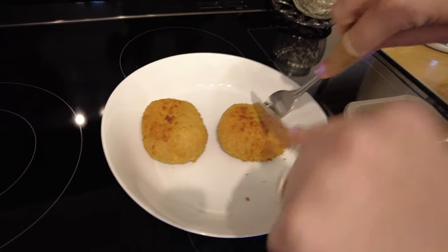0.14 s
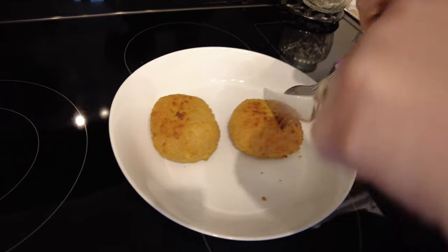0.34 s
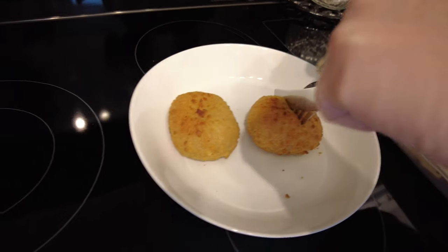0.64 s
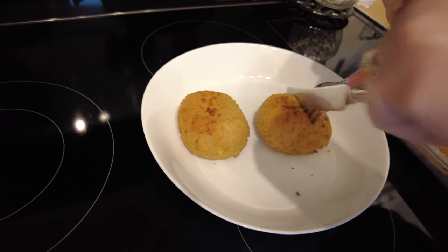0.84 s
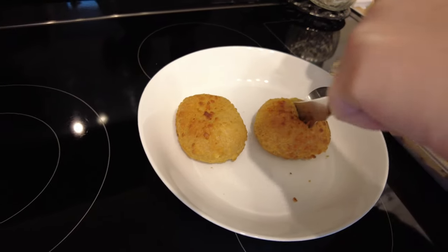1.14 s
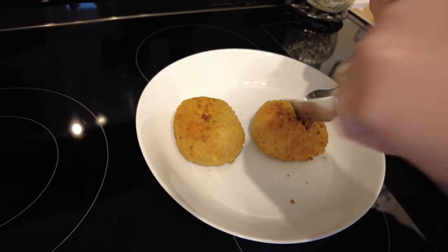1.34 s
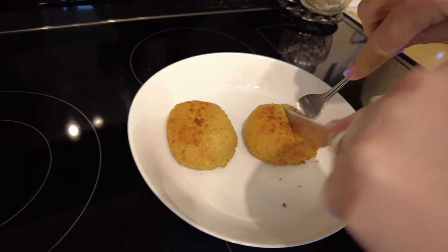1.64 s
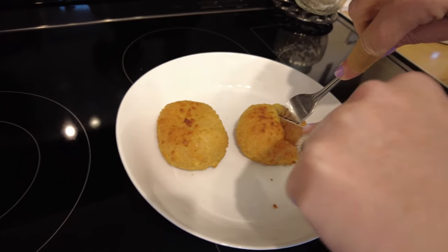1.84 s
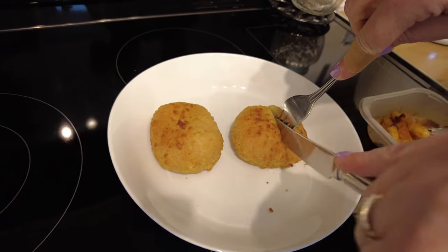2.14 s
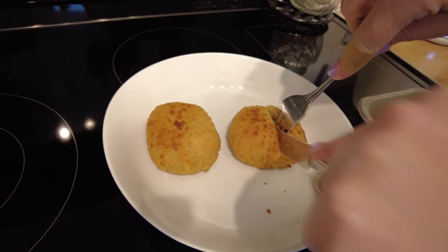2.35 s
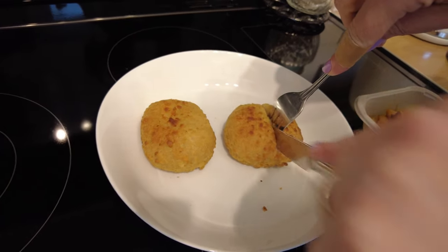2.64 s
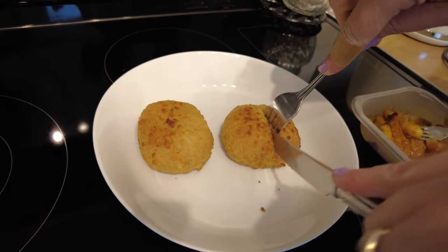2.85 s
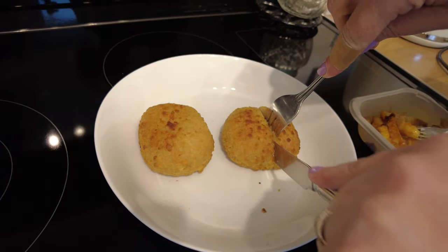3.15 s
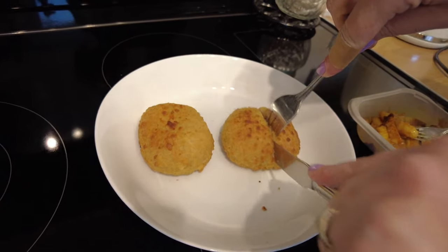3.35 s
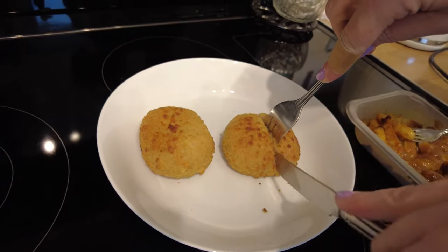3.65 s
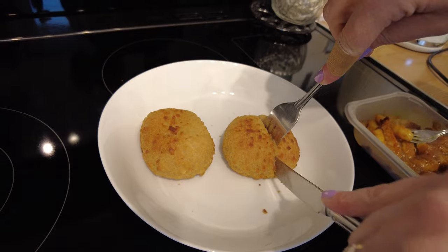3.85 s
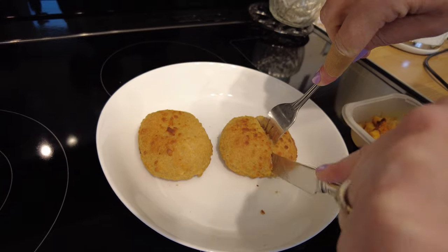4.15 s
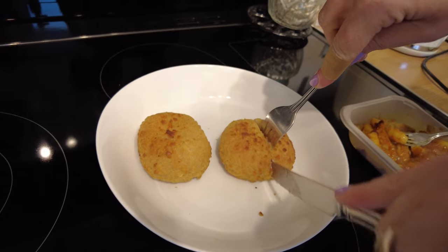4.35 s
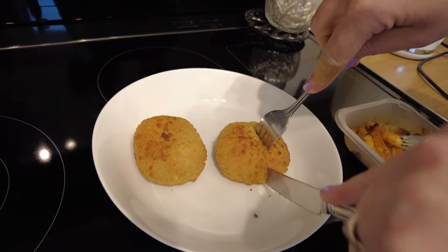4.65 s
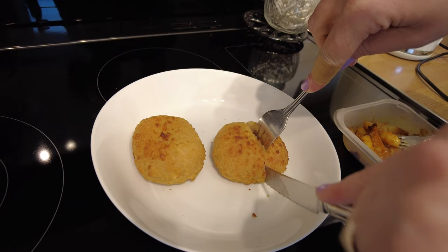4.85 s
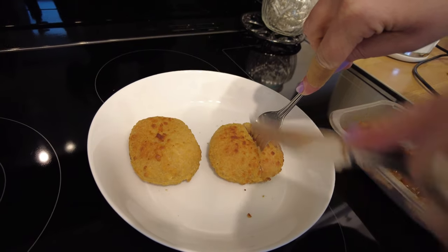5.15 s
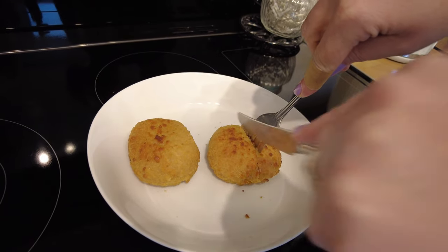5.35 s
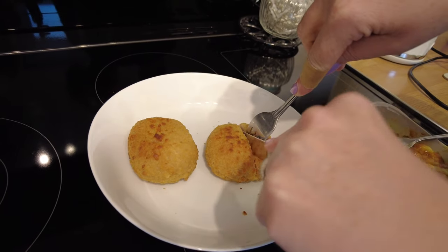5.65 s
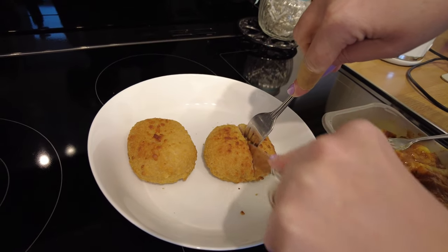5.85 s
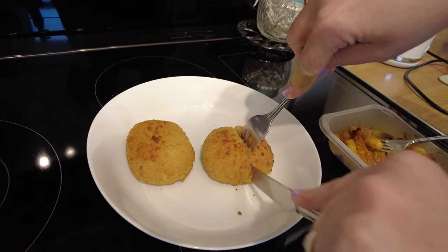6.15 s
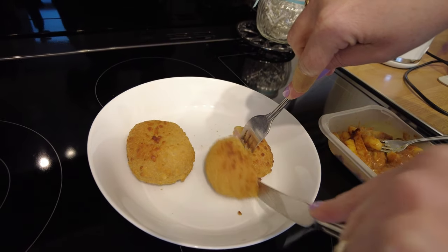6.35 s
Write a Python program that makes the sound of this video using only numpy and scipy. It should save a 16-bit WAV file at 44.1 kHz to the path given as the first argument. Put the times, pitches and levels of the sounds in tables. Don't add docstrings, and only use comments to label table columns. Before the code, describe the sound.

A steel knife and fork clink and scrape on a ceramic plate while sawing crumb-coated food, close up in a small kitchen with faint hum.

```python
import sys
import numpy as np
from scipy import signal
from scipy.fft import rfft, irfft, next_fast_len
from scipy.io import wavfile
from scipy.ndimage import uniform_filter1d, minimum_filter1d, map_coordinates

SR = 44100
rng = np.random.default_rng(int(sys.argv[2]) if len(sys.argv) > 2 else 0)


def invert_db(level):
    return 10 ** (np.asarray(level, dtype=float) / 20)


def transcribe(signal):
    frames = np.atleast_2d(signal).T
    limited = np.clip(frames, -1, 1)
    pcm = np.round(limited * 32767).astype(np.int16)
    wavfile.write(sys.argv[1], SR, pcm)


N = 286209


def unit(x):
    return x / np.sqrt(np.mean(x ** 2) + 1e-20)


def along(points, hz):
    f, v = np.transpose(points)
    return np.interp(np.log(hz + 1), np.log(f + 1), v)


def wobble(rate):
    knots = rng.standard_normal(int(N * rate / SR) + 4)
    return map_coordinates(knots, [np.arange(N) * rate / SR])


def filtered(x, response):
    m = next_fast_len(N + SR // 2)
    return irfft(rfft(x, m) * response(np.fft.rfftfreq(m, 1 / SR)), m)[..., :N]


def body(modes, widen):
    def response(f):
        total = 0
        for k, (centre, width, db) in enumerate(modes):
            loss = 1j * f * width * widen
            total = total + (-1) ** k * invert_db(db) * loss / (centre * centre - f * f + loss)
        return total
    return response


def spread(pair, alike):
    def mid_and_side(hz):
        turn = np.arccos(np.clip(along(alike, hz), -1, 1)) / 2
        return np.array([np.cos(turn), np.sin(turn)])
    mid, side = filtered(pair, mid_and_side)
    return np.array([mid + side, mid - side])


# frequency in Hz, level in dB per Hz.
AIR_COLOUR = [(76, -104.5), (130, -3.5), (194, -17), (279, -5.5), (511, -15), (1240, -13.5), (2010, -23.5),
              (2410, -18.5), (6870, -34.5), (15100, -34), (16000, -27)]
# frequency in Hz, level in dB per Hz.
RUMBLE_COLOUR = [(8, -50.5), (14, 9), (21, 9), (26, 6), (31, -17), (42, -9.5), (75, -12.5), (120, -13),
                 (200, -50.5)]
# frequency in Hz, level in dB rms.
HUM_TONES = [(100, -74), (262, -77)]
# frequency in Hz, likeness from 0 to 1.
BACKGROUND_ALIKE = [(50, 0.97), (200, 0.73), (600, 0.057), (2000, 0.24), (10000, 0.17)]


def background():
    t = np.arange(N) / SR
    air = unit(filtered(rng.standard_normal((2, N)), lambda f: invert_db(along(AIR_COLOUR, f))))
    rumble = unit(filtered(rng.standard_normal((2, N)), lambda f: invert_db(along(RUMBLE_COLOUR, f))))
    hum = 0
    for hz, db in HUM_TONES:
        level = invert_db(db + 4.5 + 0.53 * wobble(1.5))
        hum = hum + level * np.sin(2 * np.pi * hz * t + 0.16 * wobble(1.1))
    noise = invert_db(-63.77) * air + invert_db(-44.5 + wobble(0.86)) * rumble
    return spread(noise, BACKGROUND_ALIKE) * invert_db([[-.8], [.8]]) + hum


# frequency in Hz, time to fall 60 dB in seconds.
ROOM_FADE = [(100, 0.86), (1000, 0.21), (4000, 0.21), (12000, 0.18)]


def kitchen(x):
    out, hop = np.zeros((2, N + 2 * SR)), SR // 4
    for start in range(0, N, hop):
        hz, t, z = signal.stft(rng.standard_normal((2, SR // 2)), SR, nperseg=256)
        fade = invert_db(-60 * t / along(ROOM_FADE, hz)[:, None])
        tail = signal.istft(z * fade, SR, nperseg=256)[1]
        wet = signal.fftconvolve(x[None, start:start + hop], tail / np.linalg.norm(tail[0]), axes=1)
        out[:, start + 130:][:, :wet.shape[1]] += wet
    return spread(out[:, :N], [(100, 0.99), (500, 0.55), (3000, 0.16), (10000, 0.78)])


# start in seconds, length in seconds,
# then plate shuffle, blade on glaze and crumbs, each in dB.
STROKES = [(0.085, 0.027, -61, -58.5, -55), (0.315, 0.28, -58, -66.5, -60),
           (0.463, 0.29, -50.5, -62.5, -61), (0.765, 0.25, -53.5, -69.5, -64),
           (0.976, 0.14, -52, -58, -62.5), (1.084, 0.16, -41.5, -54, -48), (1.209, 0.054, -35.5, -51, -75),
           (1.335, 0.17, -65, -66.5, -61.5), (1.534, 0.051, -51.5, -70, -57),
           (1.589, 0.28, -40, -56.5, -53.5), (1.672, 0.13, -67, -65, -50.5),
           (1.995, 0.13, -55.5, -60, -60.5), (2.124, 0.052, -40.5, -58.5, -51.5),
           (2.247, 0.25, -42.5, -58, -55), (2.303, 0.13, -39, -71, -63), (2.666, 0.15, -62, -68, -70),
           (2.955, 0.16, -48.5, -62.5, -59.5), (3.087, 0.12, -55, -63, -60), (3.39, 0.067, -71, -69.5, -80),
           (3.478, 0.046, -69.5, -63.5, -73), (3.712, 0.32, -62, -65.5, -68),
           (4.529, 0.19, -56, -65, -59.5), (5.087, 0.04, -64, -94, -76), (5.615, 0.025, -59, -55, -61),
           (5.65, 0.094, -57, -56, -58), (5.842, .8, -68, -64, -70.5), (6.076, 0.13, -72, -64, -77),
           (6.208, 0.1, -59.5, -56, -60), (6.355, 0.11, -59, -65, -79)]


def strokes():
    bite_s, lift_s, arch = .018, 0.047, .9
    t, power = np.arange(N) / SR, np.full((3, N), 1e-12)
    for s, length, *levels_db in STROKES:
        u = t - s
        swell = np.sin(np.pi * np.clip(.1 + .8 * u / length, .1, .9)) ** arch
        lift = np.exp(-np.maximum(u - length, 0) / lift_s)
        shape = np.clip(u / bite_s, 0, 1) * swell * lift
        power += (invert_db(levels_db)[:, None] * shape) ** 2
    return np.sqrt(power)


def grains(share, size_db, smooth):
    pick = rng.random(N)
    size = np.minimum(rng.exponential(size=N), 3)
    noise, bed = rng.standard_normal((2, N))
    return unit((pick < share) * invert_db(size_db * size) * noise) + smooth * bed


# frequency in Hz, width in Hz, level in dB.
SHUFFLE_MODES = [(672, 120, -10.5), (936.5, 70, -2), (1144.5, 60, 0.5), (1351, 135, -2), (2700, 100, -16.5),
                 (2940, 71, -20)]
# frequency in Hz, width in Hz, level in dB.
GLAZE_MODES = [(2400, 260, 4), (2680, 200, 1), (3100, 260, -1), (4200, 300, -7), (6400, 450, -4),
               (9350, 700, -6), (12300, 900, -14)]
# frequency in Hz, level in dB per Hz.
CRUMB_COLOUR = [(880, -46), (1500, -2.5), (1880, -16.5), (2390, -35.5), (3620, -40.5), (4500, -15),
                (6830, -22.5), (15700, -16.5), (16300, -77)]
# frequency in Hz, level in dB per Hz.
HOB_COLOUR = [(26, -21.5), (45, -7.5), (87, 4), (130, -3.5), (194, -17), (247, -15), (393, -22.5),
              (434, -28.5), (500, -24.5), (650, -26), (1100, -120)]
# time in seconds, level in dB.
LEAN = [(0, -46), (1.2, -65), (2.6, -61), (3.4, -45), (4.301, -56), (5.301, -50.5), (5.951, -36.5),
        (6.49, -35)]


def friction():
    shuffle_db, glaze_db, crumb_db = 20 * np.log10(strokes())
    lean_db = np.interp(np.arange(N) / SR, *np.transpose(LEAN))
    shake_db = -39.5 + 0.55 * (shuffle_db + 42.5)
    hob_db = 20 * np.log10(np.hypot(invert_db(lean_db - 8.5), invert_db(shake_db)))

    stick = wobble(45)
    slips = filtered(grains(0.015, 3.5, 0.42), body(SHUFFLE_MODES, 0.79))
    shuffle = invert_db(shuffle_db + 3.1 * stick) * unit(slips)

    chatter = 3 * wobble(70) + 1.5 * wobble(20)
    drag = filtered(grains(0.067, 0.47, 0.8), body(GLAZE_MODES, 0.63))
    glaze = invert_db(glaze_db + 5.0 + chatter) * unit(drag)

    crunch = 3 * wobble(110) + 2 * wobble(28)
    grit = filtered(grains(0.027, 2.5, 1.1), lambda f: invert_db(along(CRUMB_COLOUR, f)))
    crumbs = invert_db(crumb_db + 2.5 + crunch) * unit(grit)

    sway = 2 * wobble(22)
    shake = filtered(rng.standard_normal(N), lambda f: invert_db(along(HOB_COLOUR, f)))
    hob = invert_db(hob_db - 4.0 + sway + 3.45 * stick) * unit(shake)
    return shuffle + glaze + crumbs, hob


# time in seconds, peak level in dB, centre in Hz.
SNAPS = [(0.257, -44, 9100), (0.343, -40, 12000), (0.379, -38, 11500), (0.3905, -40, 5950),
         (0.415, -37, 11300), (0.4436, -40, 9000), (0.4698, -38, 12100), (0.7994, -35, 11300),
         (0.887, -37, 12000), (0.9987, -41, 9000), (1.061, -42, 12000), (1.154, -33, 11000),
         (1.419, -42, 8000), (1.5886, -46, 9000), (1.675, -54, 13000), (1.6967, -28.5, 9800),
         (2.147, -36, 12000), (2.155, -42, 6050), (2.2544, -38.5, 11500), (2.3424, -40, 8000),
         (2.365, -21.5, 10100), (2.373, -43, 8100), (2.382, -36, 8000), (2.405, -31, 11500),
         (2.713, -40.5, 5960), (2.785, -46.5, 7000), (2.852, -53, 8000), (3.051, -34, 12500),
         (3.059, -39, 10200), (3.065, -41, 9500), (3.075, -41, 9500), (3.083, -37, 12000),
         (3.125, -40, 10300), (3.182, -40, 11800), (3.1911, -34, 10900), (3.376, -49, 9000),
         (3.397, -51, 9000), (3.636, -56, 14100), (3.7564, -38, 8000), (3.903, -43, 14000),
         (3.8227, -34, 13540), (4.1917, -45, 7560), (4.2832, -47.5, 5030), (4.315, -44, 13000),
         (4.435, -46, 9560), (4.6818, -36, 4380), (5.6344, -37, 9070), (5.6388, -30.5, 8830),
         (6.3819, -45, 8000)]


def snaps():
    out, t = np.zeros(N), np.arange(SR // 50) / SR
    grid = np.fft.rfftfreq(len(t), 1 / SR)
    for s, db, hz in SNAPS:
        band = body([(hz, hz, 0)], 0.96)(grid) ** 2
        burst = unit(irfft(rfft(rng.standard_normal(len(t))) * band, len(t)))
        out[round(s * SR):][:len(t)] += invert_db(db - 3.5 - 60 * t / .012) * burst
    return out


# frequency in Hz, width in Hz, level in dB.
FOOT = [(400, 660, -15), (734, 410, -8.5), (930, 260, -4), (1260, 43, -33), (1250, 18, -29.5),
        (1485, 20, -34.5)]
BELL_HZ = 2616
# frequency in Hz, level in dB, seconds to fall 60 dB.
BELL = [(BELL_HZ, -27.5, 0.51)]


def taps(events, modes, crack_db, thud_db, bell_db, rattle_db, rise_ms, lasting, rattle_ms, blur):
    out, t = np.zeros((2, N + SR)), np.arange(SR // 5) / SR
    hz, width, level = np.transpose(modes + FOOT)[:, :, None]
    width = np.maximum(width, 40)
    grid = np.fft.rfftfreq(len(t), 1 / SR)
    bumps = invert_db(2 * level) / (1 + (2 * (grid - hz) / (blur * width)) ** 2) ** 2
    colour = np.sqrt(np.sum(bumps, axis=0))
    damping = 1.3
    decay = np.exp(-np.pi * damping * width * t / lasting)
    free = decay * np.exp(2j * np.pi * hz * t)
    crack_fade = invert_db(-60 * t / 0.037)
    clatter_fade = invert_db(-11.5 - 60 * t / (0.26 * lasting))
    for s, db, low_db, high_db in events:
        high_db = min(high_db, -5)
        balance = [(1300, low_db + 20.0), (2300, -1.9), (3600, -0.022), (4500, -0.45), (7000, high_db + 9.5)]
        chance = rng.standard_normal((3, len(hz), 1))
        noise = rng.standard_normal((3, len(t)))

        strength = invert_db(level + along(balance, hz) + 1.5 * chance[0])
        apart = along([(300, .1), (900, 0.76), (3000, 0.28), (6000, 0.85), (12000, 0.6)], hz)
        apart = apart * np.sign(chance[1])
        phase = np.exp(1j * (chance[2] + apart * [1, -1]))
        ring = np.imag((strength * phase).T @ free)
        ring = ring / np.abs(ring).max()

        shared = noise[:2] + noise[2]
        crack = unit(irfft(rfft(shared) * invert_db(along(balance, grid)) * colour, len(t)))
        ring = ring + invert_db(crack_db) * (crack_fade + clatter_fade) * crack

        free_db = min(bell_db + .6 * db, -2)
        for f, b, t60 in BELL:
            ring = ring + invert_db(free_db + b - 60 * t / (t60 * lasting)) * np.sin(2 * np.pi * f * t)

        force = invert_db(rattle_db) * noise[2, :2000] * np.exp(-t[:2000] / (rattle_ms / 1000))
        force[0] = 1
        ring = signal.fftconvolve(ring, force[None], axes=1)[:, :len(t)]
        ring = ring * (1 - np.exp(-t / (rise_ms / 1000)))

        thud = 0.47 * np.sin(2 * np.pi * 120 * t) + 0.41 * np.sin(2 * np.pi * 235 * t)
        thud = thud * invert_db(thud_db + low_db + 20.5 - 60 * t / 0.13) * (1 - np.exp(-t / 0.0055))
        out[:, round(s * SR):][:, :len(t)] += invert_db(db) * (ring + thud)
    return out[:, :N]


# time in seconds, peak, low modes and high modes in dB.
LANDINGS = [(2.4705, -31, -31, -3), (2.4957, -19.5, -13, -12), (3.1964, -20, -25.5, -3),
            (3.2133, -21.5, -19.5, -13), (3.9224, -25, -24, -5), (3.929, -25, -32.5, -6.5),
            (3.9601, -36, -24.5, -5.5), (4.6087, -17, -24.5, -3), (4.6321, -38, -1, -3),
            (4.7106, -33, -36, -8), (5.662, -40.5, -8, -18), (6.3762, -34, -23, -1),
            (6.4055, -31, -24, -20)]
# frequency in Hz, width in Hz, level in dB.
EDGE = [(2340, 60, -5), (2460, 60, 0), (2940, 60, -13), (3500, 120, -17), (4300, 110, -13), (4760, 60, -15),
        (5600, 140, -19), (6300, 50, -13), (7200, 70, -18), (9100, 86, -17), (10300, 90, -22),
        (11400, 130, -18), (12700, 120, -21), (13800, 120, -21), (15000, 120, -21)]


def edge_landings():
    return taps(LANDINGS, EDGE, crack_db=-16, thud_db=-15, bell_db=-20, rattle_db=-30,
                rise_ms=0.76, lasting=0.94, rattle_ms=8.8, blur=18)


# time in seconds, peak, low modes and high modes in dB.
TINE_TAPS = [
    (0.3011, -33, -14, -3.5),
    (5.3404, -11, -29, -7),
    (5.429, -21.5, -36, -9),
    (5.4704, -26.5, -42, -6),
    (5.5044, -38, -23, -12),
]
# frequency in Hz, width in Hz, level in dB.
TINES = [(2350, 50, 0), (2600, 50, -6), (3300, 120, -17), (4200, 90, -11), (5300, 70, -13), (6030, 45, 1),
         (7400, 80, -13), (9150, 60, -7), (11000, 60, -8), (12100, 60, -9), (13140, 60, -8),
         (13370, 60, -9), (14400, 80, -11), (15200, 60, -7)]


def tine_taps():
    return taps(TINE_TAPS, TINES, crack_db=-16, thud_db=-22.5, bell_db=1.5, rattle_db=-30,
                rise_ms=0.6, lasting=0.69, rattle_ms=5.4, blur=18)


# frequency in Hz, width in Hz.
PLATE = [(2335, 80), (2615, 45), (2880, 45), (3155, 50), (3710, 50), (3980, 120), (4080, 90), (4760, 60),
         (5280, 60), (5680, 45), (6260, 50), (6490, 50), (6650, 45), (6890, 45)]
# frequency in Hz, width in Hz.
STEEL = [(7190, 45), (7350, 40), (7770, 50), (8850, 45), (9080, 45), (9330, 45), (9490, 45), (10850, 70),
         (11400, 55), (12350, 55), (12700, 45), (13700, 45), (14600, 45), (15000, 45)]


def struck(levels_db):
    return [(hz, width, db) for (hz, width), db in zip(PLATE + STEEL, levels_db)]


TICK_DB = [3, -5, -10, -9, -11, -2, -5, -13, -13, -12, -9, -11, -13, -12, -13, -13, -15, -13, -11, -13, -13,
           -12, -12, -12, -13, -14, -14, -14]
# frequency in Hz, width in Hz, level in dB.
ROCKING_LOW = [(730, 22, -23.5), (851, 64, -0.5), (1122, 70, -6.5), (1305, 57, -19)]
# time in seconds, peak, low modes and high modes in dB.
BLADE_TAPS = [(0.1411, -23.5, -24, -8.5), (0.8777, -24, -17.5, -20), (1.0446, -18, -19.5, -19),
              (3.4762, -31.5, -19, -23), (4.35, -32.5, -23, -13.5)]
# time in seconds, peak, low modes and high modes in dB.
RIM_TAPS = [(0.6881, -30, -7, -4), (0.8485, -35.5, -15, -4), (0.9289, -30, -11, -10),
            (1.0253, -28, -8, -17), (1.1471, -29.5, -16, -20), (1.394, -30, 1, -13), (1.5435, -33, -8, -18),
            (1.6132, -32, -10, -14), (2.0369, -32, -14, -19), (2.1415, -33.5, 4, -9),
            (2.3418, -20, -7.5, -13), (2.3656, -19.5, -9.5, -16), (2.973, -39, 16, -4),
            (3.1188, -32.5, -30, -5.5), (3.7986, -28, -15.5, -11), (4.549, -35.5, 8, -9.5),
            (4.573, -28, -2, -18), (5.1241, -38, -7.5, -1.5)]


def scuffing_taps():
    blade = taps(BLADE_TAPS, struck(TICK_DB), crack_db=-16, thud_db=-27.5, bell_db=-8, rattle_db=-36,
                 rise_ms=.4, lasting=0.49, rattle_ms=3.3, blur=18)
    rim = taps(RIM_TAPS, ROCKING_LOW + struck(TICK_DB), crack_db=-16, thud_db=-32.0, bell_db=-10, rattle_db=-36,
               rise_ms=1.0, lasting=0.68, rattle_ms=6.7, blur=18)
    return blade + rim


# time in seconds, peak, low modes and high modes in dB.
RIM_STRIKE = [(1.2385, 0, -22, -8)]
TIP_STRIKE = [(1.912, -11.5, -22.5, -12)]
HEEL_STRIKE = [(5.6988, 6, -21.5, -10)]
RIM_DB = [4, -8, -14, -11, -14, -6, 2, -18, -15, -7, -12, -16, -10, -13, -20, -20, -27, -24, -16, -8, -14,
          -18, -23, -25, -26, -33, -23, -30]
TIP_DB = [-4, -9, -14, -14, -12, -3, -7, -22, -18, -14, 0, -8, -12, -14, -17, -18, -27, -12, -5, -15, -14,
          -18, -15, -14, -18, -28, -16, -24]
HEEL_DB = [5, -2, -4, -5, -3, 5, -8, -14, -14, -12, -8, 0, -10, -1, -12, -5, -15, -12, -4, -10, -5, -10,
           -15, -11, -5, -15, -15, -13]


def clean_strikes():
    clean = dict(crack_db=-17, rattle_db=-36, rise_ms=.4, lasting=.62, blur=8)
    heel = taps(HEEL_STRIKE, struck(HEEL_DB), thud_db=-25.0, bell_db=-12, rattle_ms=1.5, **clean)
    tip = taps(TIP_STRIKE, struck(TIP_DB), thud_db=-27.0, bell_db=1, rattle_ms=3.2, **clean)
    rim = taps(RIM_STRIKE, ROCKING_LOW + struck(RIM_DB), thud_db=-20.5, bell_db=-5.5, rattle_ms=8.8, **clean)
    return heel + tip + rim


def scene():
    steel = clean_strikes() + scuffing_taps() + tine_taps() + edge_landings()
    rub, hob = friction()
    rub = rub + snaps()
    mirrored = np.roll(rub, 37)
    near = spread(np.array([rub, mirrored]), [(300, 0.6), (800, 0.7), (3000, 0.9), (8000, 0.4)])
    near = invert_db(-3.0) * near * invert_db([[-.8], [.8]])
    room = kitchen(invert_db(-7.5) * steel[0] + invert_db(-8.0) * rub)
    return steel + near + hob + room + background()


def camera_smear(x, step_db, gap_db):
    hz, _, z = signal.stft(x, SR, nperseg=1024)
    band = np.abs(uniform_filter1d(np.abs(z) ** 2, size=10, axis=1))
    held = np.abs(uniform_filter1d(band.sum(axis=0), size=3, axis=1))
    masker = -minimum_filter1d(-held, size=70, axis=0)
    step = invert_db(step_db) * np.sqrt(band) + 1e-12
    always = ((hz < 7300) | (hz > 15000))[:, None]
    kept = (held > masker * invert_db(2 * gap_db)) | always
    smeared = step * np.round(z / step) * kept
    smeared[:, :20] = z[:, :20]
    return signal.istft(smeared, nperseg=1024)[1][:, :N]


def top_cut(x):
    return signal.sosfilt(signal.butter(12, 16980, fs=SR, output="sos"), x)


def record(dry):
    heard = dry / (1 + np.abs(dry) ** 6) ** (1 / 6)
    heard = camera_smear(heard, step_db=-5, gap_db=-13)
    heard = filtered(heard, lambda hz: 1 / (1 + (hz / 16000) ** 400))
    return top_cut(heard)


dry = scene()
out = record(dry)
transcribe(out)
```